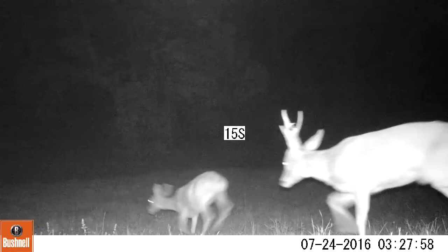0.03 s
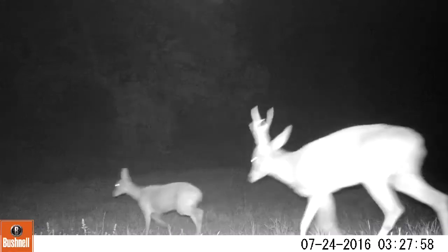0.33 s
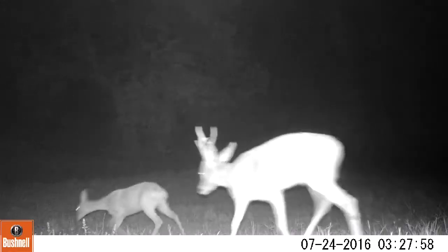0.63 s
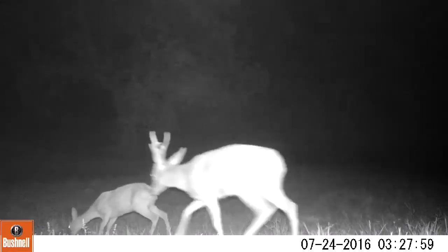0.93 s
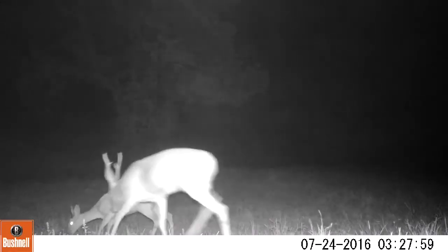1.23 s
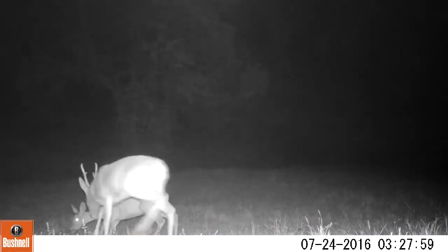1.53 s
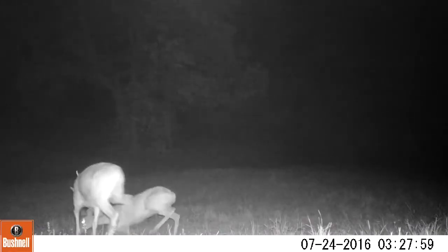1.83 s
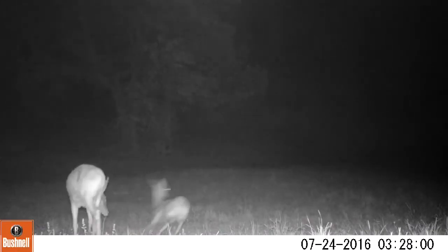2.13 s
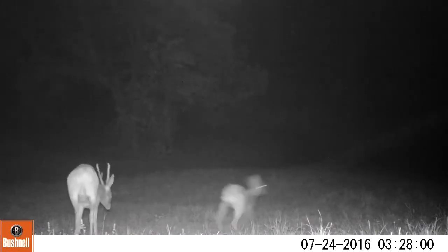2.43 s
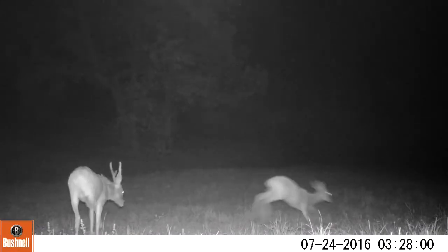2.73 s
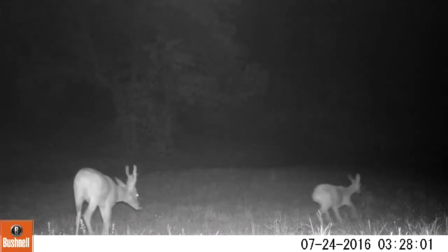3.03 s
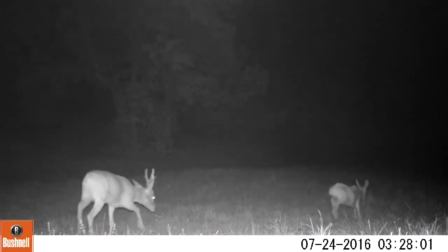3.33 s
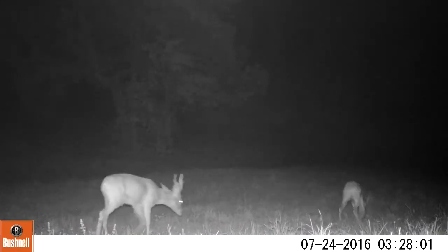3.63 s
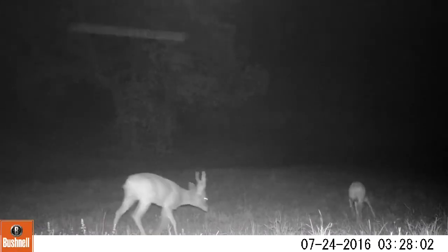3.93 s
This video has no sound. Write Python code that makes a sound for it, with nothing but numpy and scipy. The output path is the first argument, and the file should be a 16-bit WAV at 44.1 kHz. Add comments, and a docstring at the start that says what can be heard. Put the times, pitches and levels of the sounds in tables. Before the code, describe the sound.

Thin, airy deer squeals sound twice in a windy field as dry stalks snap.

```python
"""A field at night. A trail camera wakes with a soft thump, and its electronics putter under a steady wind.
Hooves brush the grass and snap dry stalks. At about one second a roe deer forces air through its tight
throat in a thin, breathy squeal. A very faint, far whistle follows, and near three seconds the wind
swells into a low gust on the microphone. One more stalk snaps, then the deer squeals again."""
import sys
import numpy as np
from scipy import signal
from scipy.fft import rfft, irfft
from scipy.io import wavfile

SR = 44100
rng = np.random.default_rng(int(sys.argv[2]) if len(sys.argv) > 2 else 0)


def unload_wav(signal):
    """Save mono or channel-first audio to the path in sys.argv[1] as 16-bit WAV at rate SR, clipped to [-1, 1]."""
    wavfile.write(
        sys.argv[1],
        SR,
        np.round(np.clip(np.atleast_2d(signal).T, -1, 1) * 32767).astype(np.int16),
    )


N = 176400


def gain(db):
    """Turns decibels into a number to multiply by."""
    return 10 ** (np.asarray(db) / 20)


def unit_level(x):
    """Scales a sound so that its average level (rms) is one."""
    return x / np.sqrt(np.mean(x ** 2) + 1e-20)


def curve(table, t, column=1):
    """Joins a table's rows with straight lines and reads one column at times t."""
    columns = np.transpose(table)
    return np.interp(t, columns[0], columns[column])


def add(mix, start_s, sound):
    """Mixes a sound in at its start time."""
    part = mix[max(round(start_s * SR), 0):][:len(sound)]
    part += sound[:len(part)]


def coloured_noise(colour):
    """Noise whose low and high parts are as strong as the table says."""
    hz, db = np.transpose(colour)
    shape = gain(np.interp(np.log(np.fft.rfftfreq(N, 1 / SR) + 1), np.log(hz + 1), db))
    return irfft(rfft(rng.standard_normal(N)) * shape, N) * np.sqrt(SR / 2)


def wander(hz):
    """A smooth, random drift, mostly slower than hz."""
    keep_slow = np.exp(-(np.fft.rfftfreq(N, 1 / SR) / hz) ** 2)
    return unit_level(irfft(rfft(rng.standard_normal(N)) * keep_slow, N))


def airy_tone(hz, width_hz, size):
    """Noise ringing around a pitch that may glide; wider sounds breathier."""
    spin = np.exp(2j * np.pi * np.cumsum(hz * np.ones(size)) / SR)
    fade = np.exp(-np.pi * width_hz / SR)
    # shift the noise down, keep its slow part, then shift it back up to the pitch
    air = rng.standard_normal(N) / spin[np.arange(N) % size]
    slow = signal.lfilter([(1 - fade) ** 2], [1, -2 * fade, fade * fade], air)[-size:]
    return unit_level((spin * slow).real)


def camera_wakes(sound, wake_s=0.12, fade_s=0.059, swing_s=0.069, thump_db=-23):
    """The sound fades in while the camera's input swings once and settles: a soft thump."""
    awake_s = np.maximum(np.arange(N) / SR - wake_s, 0)
    swing = awake_s / swing_s
    thump = gain(thump_db) * swing * np.exp((1 - swing ** 2) / 2)
    return sound * np.minimum(awake_s / fade_s, 1) - thump


# The colour of the wind and hiss. Each row: frequency in Hz, level in dB per Hz.
WIND_COLOUR = [(8, -55.5), (40, -60.5), (100, -61), (200, -64), (300, -67), (450, -70.5), (1000, -79),
               (2000, -87.5), (3200, -91.5), (4200, -91.5), (5100, -95), (7000, -97.5), (10000, -100.5),
               (15500, -104)]


def wind(sway_db=0.73):
    """A steady wash of air and microphone hiss that sways a little in level."""
    return coloured_noise(WIND_COLOUR) * gain(sway_db * wander(hz=4.5))


# How hard the gust blows. Each row: time in seconds, level in dB.
GUST_LEVELS = [(.55, -40), (.72, -35.5), (.95, -43.5), (2.4, -51), (2.65, -36), (2.8, -30.5), (2.99, -24),
               (3.19, -28), (3.3, -32), (3.55, -49), (3.9, -33.5), (4.0, -35)]
# Its deep colour. Each row: frequency in Hz, relative level in dB.
GUST_TONE = [(8, -20), (22, -5.5), (36, 4.5), (60, -7), (110, -15.5), (250, -38), (1000, -68)]


def gust(t):
    """Wind buffets the microphone with a low rumble that swells and sinks."""
    return gain(curve(GUST_LEVELS, t)) * unit_level(coloured_noise(GUST_TONE))


def putter(t, rate_hz=22.244, first_s=0.0256, pulse_s=0.0051, spread=0.31):
    """The electronics draw current in even pulses; each dips the input, which then overshoots."""
    cycles = (t - first_s) * rate_hz
    strength = (1 + spread * rng.standard_normal(N))[np.floor(cycles).astype(int)]
    dips = -strength * (cycles % 1 < pulse_s * rate_hz)
    rounded = signal.lfilter(*signal.butter(2, 264, fs=SR), dips)
    overshooting = signal.lfilter(*signal.butter(1, 27, "high", fs=SR), rounded)
    return gain(-27.5) * overshooting


# Hooves brushing through grass. Each row: time in seconds, level in dB.
GRASS_LEVELS = [(.15, -64), (.32, -59), (.45, -67), (.75, -63), (.95, -62), (1.65, -62), (1.9, -74)]
# The colour of the blades. Each row: frequency in Hz, relative level in dB.
GRASS_COLOUR = [(1500, -32), (3000, -4), (4100, 0.5), (5200, -12), (7000, -10), (14000, -19)]


def grass_rustle(t, clump_db=3):
    """Grass blades scrape in small, uneven clumps as the deer walks by."""
    scraping = coloured_noise(GRASS_COLOUR) * gain(clump_db * wander(hz=60.4))
    return gain(curve(GRASS_LEVELS, t)) * unit_level(scraping)


# Stalks breaking underfoot. Each row: start in seconds, peak level in dB, main ring in Hz,
# decay in seconds, level of the bright ring compared with the main one in dB.
STALK_SNAPS = [(0.317, -46, 4400, .003, -9), (.3690, -39, 3470, .001, -6.5), (0.548, -40, 4380, .0012, -11),
               (0.7202, -35, 3630, .0016, -18), (0.7367, -38.5, 3950, .004, -13),
               (.7582, -42, 4000, .002, -18), (1.0205, -38, 4250, .002, -18), (1.361, -38, 3845, .002, -15),
               (1.677, -40.5, 4340, .002, -16), (2.4468, -41.5, 3820, .0015, -12),
               (3.5302, -31, 3710, .0008, -1.5)]


def stalk_snap(peak_db, ring_hz, decay_s, bright_db):
    """A stalk breaks: a tiny burst with a main ring and a brighter one."""
    t = np.arange(0, 6 * max(decay_s, .0003), 1 / SR)
    main = airy_tone(ring_hz, width_hz=1200, size=len(t))
    bright = gain(bright_db) * airy_tone(6700, width_hz=1500, size=len(t))
    rise = 1 - np.exp(-10 * t / decay_s)
    burst = (main + bright) * rise * np.exp(-t / decay_s)
    return gain(peak_db) * burst / abs(burst).max()


# How hard the deer pushes in each squeal. Each row: time in seconds, effort in dB.
FIRST_EFFORT = [(.97, -72), (1.024, -55), (1.076, -53.5), (1.1, -46.5), (1.18, -51.5), (1.24, -58),
                (1.3, -57.5), (1.36, -50), (1.39, -56), (1.455, -53.5), (1.55, -67)]
SECOND_EFFORT = [(3.735, -63), (3.785, -62), (3.812, -53), (3.865, -57), (3.92, -55.5), (4.0, -58.5)]
# The throat's two tones. Each row: time in seconds, lower pitch in Hz, upper pitch in Hz,
# level of the lower tone compared with the upper in dB.
FIRST_THROAT = [(1.0, 3590, 4160, -1), (1.11, 3500, 4034, -7), (1.229, 3383, 4065, 0),
                (1.36, 3476, 3987, -4), (1.46, 3440, 4140, -6)]
SECOND_THROAT = [(3.75, 3480, 3900, 2), (3.85, 3390, 3860, -1), (4.0, 3320, 3860, -1)]


def deer_squeal(effort, throat, waver_depth=0.00646, rasp_db=1):
    """Air forced through a tight throat whistles in two rasping, wavering tones."""
    t = np.arange(effort[0][0], effort[-1][0], 1 / SR)
    n = len(t)
    waver = 1 + waver_depth * wander(hz=27.4)[:n]
    lower_hz, upper_hz, lower_db = (curve(throat, t, column) for column in (1, 2, 3))
    lower = gain(lower_db) * airy_tone(lower_hz * waver, width_hz=260, size=n)
    upper = airy_tone(upper_hz * waver, width_hz=330, size=n)
    rasp = unit_level(gain(rasp_db * wander(hz=90)[:n]))
    return t[0], gain(curve(effort, t)) * rasp * (lower + upper)


# A very faint, far whistle. Each row: time in seconds, level in dB.
WHISTLE_LEVELS = [(2.1, -76), (2.3, -68), (2.55, -64), (2.8, -63), (3.0, -76)]


def far_whistle(t):
    """A thin, airy tone that swells and fades."""
    sounding = (t > WHISTLE_LEVELS[0][0]) & (t < WHISTLE_LEVELS[-1][0])
    return sounding * gain(curve(WHISTLE_LEVELS, t)) * airy_tone(2970, width_hz=220, size=N)


def scene():
    """Mixes the wind, the camera's putter, the whistle, the grass and the deer into one channel."""
    t = np.arange(N) / SR
    mix = wind() + gust(t) + putter(t) + far_whistle(t) + grass_rustle(t)
    add(mix, *deer_squeal(FIRST_EFFORT, FIRST_THROAT))
    add(mix, *deer_squeal(SECOND_EFFORT, SECOND_THROAT))
    for start_s, *stalk in STALK_SNAPS:
        add(mix, start_s, stalk_snap(*stalk))
    return mix[None]


def record(dry):
    """The camera wakes, and it cuts off the treble above 15800 Hz."""
    treble_cut = signal.firwin(511, 15800, window=("kaiser", 9), fs=SR)
    return signal.oaconvolve(camera_wakes(dry), treble_cut[None], "same")


dry = scene()
out = record(dry)
unload_wav(out)
```